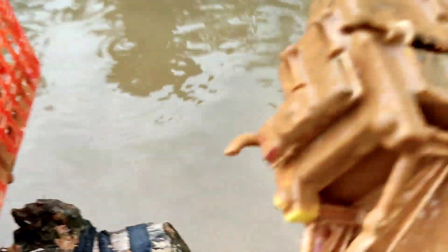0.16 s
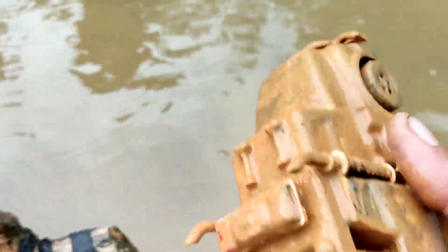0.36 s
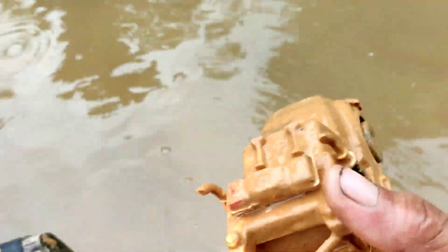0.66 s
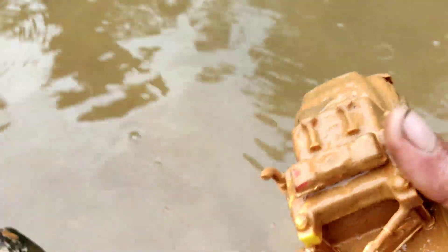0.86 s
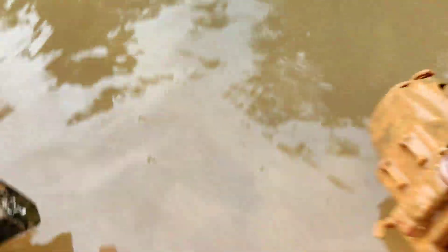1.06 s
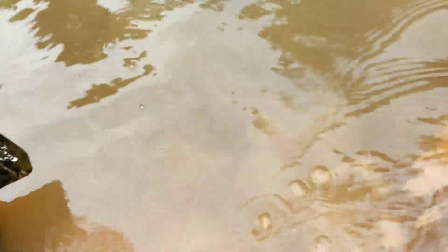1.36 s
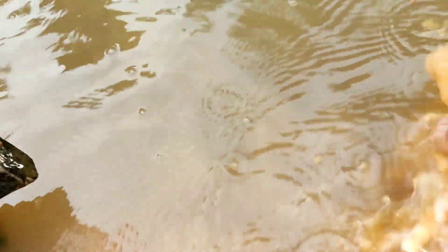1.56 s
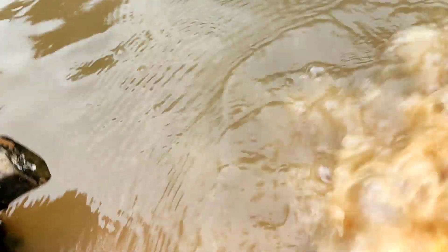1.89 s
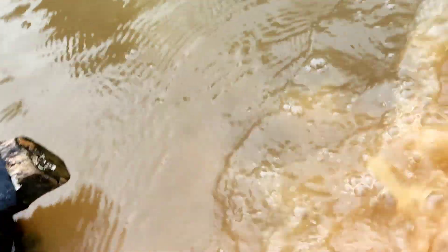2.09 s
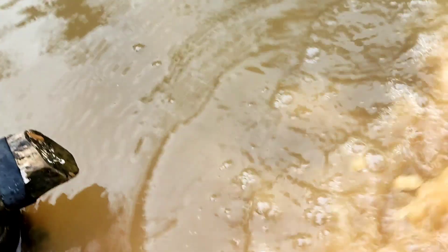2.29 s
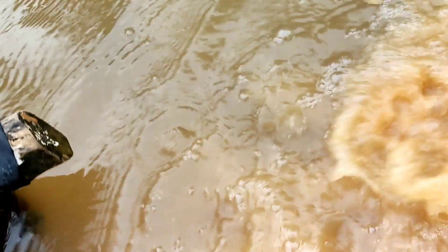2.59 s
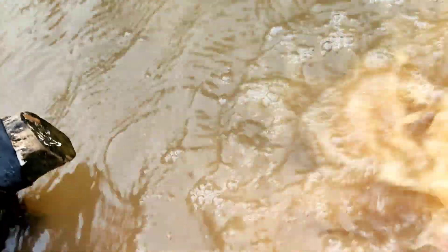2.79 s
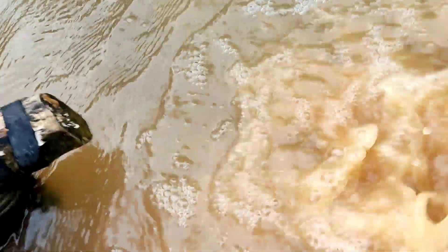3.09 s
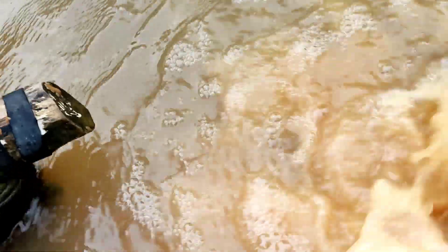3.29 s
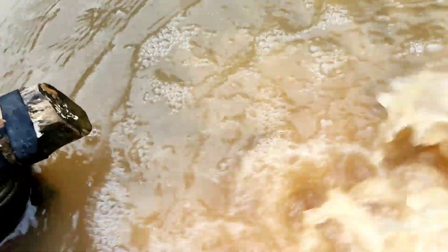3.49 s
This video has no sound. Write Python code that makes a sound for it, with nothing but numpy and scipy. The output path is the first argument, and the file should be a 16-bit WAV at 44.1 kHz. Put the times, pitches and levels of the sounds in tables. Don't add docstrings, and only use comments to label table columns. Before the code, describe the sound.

Water sloshing: a hollow toy drips, gets dunked three times, then is swished to and fro

```python
import sys
import numpy as np
from scipy import signal
from scipy.fft import rfft, irfft
from scipy.io import wavfile

SR = 44100
rng = np.random.default_rng(int(sys.argv[2]) if len(sys.argv) > 2 else 0)


def generate_wav(signal):
    frames = np.transpose(np.atleast_2d(signal))
    scaled = np.clip(frames, -1, 1) * 32767
    pcm = np.round(scaled).astype(np.int16)
    wavfile.write(sys.argv[1], SR, pcm)


def gain_from_db(level_db):
    decades = np.asarray(level_db, float) / 20
    return 10 ** decades


N = 160965
PORT_LAG = -5


def in_time(rows, outside_db=-90):
    s, *columns = np.transpose(rows)
    t = np.arange(N) / SR
    return np.array([np.interp(t, s, c, outside_db, outside_db) for c in columns])


def rms_one(x):
    return x / np.sqrt(np.mean(x ** 2) + 1e-20)


def drift(rate):
    knots = rng.standard_normal(int(N / SR * 60) + 3)
    smooth = signal.lfilter([1], [1, -np.exp(-rate / 10)], knots)
    return np.interp(np.arange(N) / SR * 60, np.arange(len(knots)), rms_one(smooth))


# (frequency [Hz], coherence [0-1])
COHERENCE = [(30, 0.5), (100, 0.93), (300, 0.76), (900, 0.84), (2000, 0.06), (5000, 0), (12000, 0.15)]


def field(spectrum):
    hz = np.maximum(np.fft.rfftfreq(N, 1 / SR), 1)

    def read(points):
        point_hz, value = np.transpose(points)
        return np.interp(np.log(hz), np.log(point_hz), value)

    common, left, right = rfft(rng.standard_normal((3, N)))
    alike = np.clip(read(COHERENCE), 0, 1)
    lag = np.array([np.exp(-2j * np.pi * hz * PORT_LAG / SR), np.ones(len(hz))])
    shared = np.sqrt(alike) * common * lag
    separate = np.sqrt(1 - alike) * np.array([left, right])
    inside = (hz > spectrum[0][0] / 2) & (hz < spectrum[-1][0] * 2)
    return rms_one(irfft((shared + separate) * gain_from_db(read(spectrum)) * inside, N))


def patchy(noise, edges_hz, depth_db, rate):
    out = np.zeros_like(noise)
    for k, band in enumerate(zip(edges_hz, edges_hz[1:])):
        sos = signal.butter(2, band, "band", fs=SR, output="sos")
        swell = gain_from_db(depth_db * np.minimum(drift(rate), 1))
        out += (-1) ** k * signal.sosfilt(sos, noise) * swell
    return out


def port(x, resonances):
    out = x.copy()
    for hz, width_hz, db in resonances:
        r = np.exp(-np.pi * width_hz / SR)
        zeros = [(1 - r * r) / 2, 0, (r * r - 1) / 2]
        poles = [1, -2 * r * np.cos(2 * np.pi * hz / SR), r * r]
        out += gain_from_db(db) * signal.lfilter(zeros, poles, x)
    return out


def plops(s, db, hz, cycles, rise, onset_s=0.00068):
    out = np.zeros(N + SR)
    for start, gain, f in zip((s * SR).astype(int), gain_from_db(db), hz):
        turns = np.arange(int(3 * cycles / f * SR)) * f / SR
        shape = np.exp(-2 * turns / cycles) * np.minimum(turns / f / onset_s, 1)
        out[start:start + len(turns)] += gain * shape * np.sin(2 * np.pi * turns * (1 + rise * turns))
    return np.array([np.roll(out[:N], PORT_LAG), out[:N]])


def clumps(marks, length_s):
    r = np.exp(-1 / (length_s * SR))
    return signal.filtfilt([np.sqrt(2 / (1 - r)) * (1 - r)], [1, -r], marks + 1e-18)


# (frequency [Hz], density [dB per Hz])
AIR_COLOUR = [(150, 6.5), (500, -2), (1000, -4), (2500, -1), (6000, -2), (8300, -5.5), (12500, 1.5),
              (14000, -5.5)]
# (frequency [Hz], density [dB per Hz])
WIND_COLOUR = [(15, -7), (25, 13.5), (40, -4), (65, 8.5), (100, -5.5), (200, -8.5), (300, -30)]
# (centre [Hz], width [Hz], level [dB])
INSECT_BAND = [(9150, 450, 6)]
# (time [s], level [dB])
RECORDER_GAIN = [(0, 6.5), (.6, 8), (1.32, 10), (1.4, 1.5), (1.6, 2), (3.65, 4)]
HISS_BANDS = [400, 1500, 2500, 3300, 4300, 5600, 7200, 9000, 11300, 13500, 17000]


def outdoors():
    gain_db = in_time(RECORDER_GAIN, -7)[0]
    air = port(field(AIR_COLOUR), INSECT_BAND)
    hiss = gain_from_db(-51.5 + gain_db) * patchy(air, [60, *HISS_BANDS], 1.5, 12.0)
    wind_db = -50 + .9 * gain_db + 1.5 * drift(9.0)
    return hiss + gain_from_db(wind_db) * field(WIND_COLOUR)


# (time [s], peak level [dB], pitch [Hz])
DRIP_EVENTS = [(0.083, -41, 1540), (0.12, -34, 1800), (0.135, -34, 1040), (0.15, -39.5, 910),
               (0.433, -39.5, 980), (0.502, -36.5, 2660), (0.535, -37, 1510), (0.627, -33.5, 1070),
               (0.661, -38, 1020), (0.684, -38, 1190), (0.728, -36.5, 1010), (0.959, -23.5, 618),
               (1.07, -35.5, 1125), (1.208, -35.5, 1430), (1.24, -36.5, 990)]


def drips():
    s, db, hz = np.transpose(DRIP_EVENTS)
    marks = np.zeros(N)
    marks[(s * SR).astype(int)] = gain_from_db(db - 0.5)
    tick_colour = [(300, -11), (900, -1.5), (3000, -1.5), (6000, -15.5)]  # (Hz, dB per Hz)
    ticks = clumps(marks, 0.003) * field(tick_colour)
    bubbles = plops(s, db - 10 * (hz < 700), hz, 14, 0.0073)

    draws = rng.random((70, 3))
    trickle_s = 0.33 + 0.72 * draws[:, 0]
    trickle_db = -53 + 14 * draws[:, 2] ** 2
    trickle_hz = 850 * gain_from_db(4.65 * draws[:, 1] ** 2)
    return bubbles + ticks + plops(trickle_s, trickle_db, trickle_hz, 11.0, 0.0216)


# (frequency [Hz], density [dB per Hz])
SPRAY_COLOUR = [(800, -3), (2000, 3.5), (3400, 0), (5000, -2), (7500, -2), (11000, -4), (14000, -3),
                (15500, -1)]
# (time [s], peak level [dB], left-right difference [dB])
SPIT_EVENTS = [(1.315, -4, 6), (1.3298, 4, -2), (1.349, 12, -11), (1.3557, 9.5, -3.5), (1.3607, 0, -11),
               (1.423, -3.5, 12), (1.451, 4, 5), (1.4754, -7, 5.5), (1.5937, -5, -11), (1.6171, 3.5, 1),
               (1.714, 3.5, 5), (1.739, 2.5, 3), (1.7695, 6.5, -11), (1.816, -5, 0), (1.8414, 4.5, -19),
               (1.848, 2, -14), (1.855, -3, 0), (2.0547, 14.5, -2), (2.116, -16, -12), (2.122, 2.5, -7),
               (2.1987, -1, -11), (2.2572, -6, 3), (2.3353, 10.5, -4), (2.3737, 5, 4), (2.5097, -4, -1),
               (2.6024, -7, 10), (2.6845, 11, 3), (2.692, 6, -7), (2.7144, 5, 11), (2.808, -15, 0),
               (2.87, 4.5, -4), (2.93, 6, 5), (3.0235, -7, 17), (3.1314, 10.5, 0.5), (3.2005, 0.5, 5),
               (3.258, -1, 12), (3.4014, 7.5, 2), (3.418, 1, 2)]


def spray(level):
    clumps_per_s, clump_s, clump_spread_db, bed = 200, .0013, 4.0, .5
    spit_s, spit_low_hz = .0007, 3440
    chosen = rng.random(N) < clumps_per_s / SR
    sizes = gain_from_db(clump_spread_db * np.minimum(rng.exponential(1, N), 4)) * chosen
    sides = gain_from_db(rng.normal(0, 0.68, N) * np.array([[1], [-1]]))
    grain = rms_one(bed + clumps(sizes * sides, clump_s) / 4) * gain_from_db(0.81 * drift(6.2))

    spits = np.zeros((2, N))
    for s, db, pan_db in SPIT_EVENTS:
        spits[:, int(s * SR)] = gain_from_db(-22.5 + db + np.array([pan_db, -pan_db]) / 2)

    hiss = patchy(field(SPRAY_COLOUR), HISS_BANDS, 3.84, 46.0)
    thin = signal.sosfilt(signal.butter(2, spit_low_hz, "high", fs=SR, output="sos"), hiss)
    return hiss * gain_from_db(-4) * level * grain + thin * clumps(spits, spit_s)


# (time [s], length [s], first pitch [Hz], last pitch [Hz], level [dB])
GLUG_EVENTS = [(1.661, 0.06, 350, 702, -36), (1.69, 0.054, 750, 1050, -28.5),
               (1.5, 0.0407, 1400, 1500, -35), (3.374, 0.031, 230, 272, -21),
               (2.295, 0.018, 220, 246, -27.5), (3.9, 0.066, 620, 670, -17), (3.7, 0.038, 230, 426, -14.5),
               (3.14, 0.073, 260, 283, -31), (2.178, 0.029, 270, 330, -23.5), (2.9, 0.031, 465, 320, -20.5),
               (1.8, 0.045, 240, 306, -24.5), (1.42, 0.036, 600, 430, -40.5)]


def glugs():
    out = np.zeros(N)
    waver = rms_one(clumps(rng.standard_normal(N), 0.001527))
    lumps = rms_one(clumps(rng.standard_normal(N), 0.0012))
    t = np.arange(N) / SR
    for s, length, first_hz, last_hz, db in GLUG_EVENTS:
        part = np.clip((t - s) / length, 0, 1)
        hz = first_hz * (last_hz / first_hz) ** part * (1 + .17 * waver)
        swell = gain_from_db(db + 3.4 * lumps) * np.sin(np.pi * part) ** .5
        out += swell * np.sin(2 * np.pi * np.cumsum(hz) / SR)
    return out


# (frequency [Hz], density [dB per Hz])
SLOSH_COLOUR = [(60, -61), (100, -20), (260, -8.5), (700, -14), (1200, -13.5), (2600, -12), (3400, -33),
                (5000, -15.5)]
SLOSH_BANDS = [40, 200, 400, 700, 1100, 1800, 2800, 6000]
# (time [s], peak level [dB], pitch [Hz])
POCKET_EVENTS = [(1.355, -13, 800), (1.472, -17.5, 448), (1.515, -24.5, 330), (1.616, -22, 178),
                 (1.708, -15.5, 557), (1.811, -16.5, 864), (1.835, -19.5, 930), (1.873, -13, 1620),
                 (1.93, -20, 780), (1.966, -9.5, 950), (1.98, -6.5, 1440), (2.014, -16, 400),
                 (2.077, -15, 920), (2.146, -25, 930), (2.179, -16, 990), (2.186, -17, 290),
                 (2.219, -16, 750), (2.254, -11, 1080), (2.392, -19, 1820), (2.483, -15.5, 920),
                 (2.543, -23.5, 900), (2.617, -19, 800), (2.637, -25, 950), (2.675, -17.5, 560),
                 (2.778, -12, 1520), (2.82, -12, 545), (2.852, -14, 996), (2.892, -13.5, 550),
                 (2.974, -28, 560), (3.021, -15, 1010), (3.055, -16, 1000), (3.095, -10, 973),
                 (3.242, -14.5, 990), (3.252, -11, 960), (3.291, -7, 835), (3.315, -10.5, 840),
                 (3.417, -20, 940), (3.432, -7.5, 664), (3.469, -8.5, 630), (3.49, -11.5, 743),
                 (3.525, -14, 547), (3.616, -24.5, 240)]


def gurgle(level):
    bubbles_per_s = 400
    draws = rng.random((int(bubbles_per_s * N / SR), 4))
    s, hz = draws[:, 0] * N / SR, 380 * gain_from_db(17.85 * draws[:, 1])
    bubble_db = -3.6 * np.log(draws[:, 2] + 0.075) - 6.9 * np.abs(np.log2(hz / 950))
    crowd = plops(s, bubble_db, hz, 7.0, .016)

    some = draws[::4]
    pop_db = -4.0 * np.log(some[:, 2] + .03)
    pops = plops(some[:, 3] * N / SR, pop_db, 300 + 1.3 * hz[::4], 1, 0, onset_s=.0001)
    pops = signal.lfilter([1, -1], [1, -.97], pops)

    slosh = patchy(field(SLOSH_COLOUR), SLOSH_BANDS, 4.53, 45.0)
    pockets = plops(*np.transpose(POCKET_EVENTS), 4.8, 0.011, onset_s=0.0008)
    churn = gain_from_db(-4.5) * slosh + gain_from_db(-3.5) * rms_one(crowd) + gain_from_db(-9.5) * rms_one(pops)
    return level * churn + pockets + glugs()


# (time [s], spray level [dB], gurgle level [dB])
DIP_STROKES = [
    [(1.3, -71, -83), (1.362, -17.5, -34), (1.38, -44, -47), (1.41, -25, -59)],
    [(1.41, -34, -44), (1.418, -58, -37), (1.502, -15, -30), (1.57, -57, -56)],
    [(1.57, -47, -43), (1.624, -33.5, -37), (1.63, -42.5, -51), (1.78, -36.5, -34.5)],
]
# (time [s], spray level [dB], gurgle level [dB])
SWISH_STROKES = [
    [(1.78, -31.5, -38.5), (1.852, -23.5, -33.5), (1.866, -25.5, -35.5), (1.95, -20, -27.5),
     (2.064, -20, -30), (2.145, -42, -37.5)],
    [(2.145, -43, -35), (2.195, -24.5, -21.5), (2.293, -19, -25), (2.363, -33, -36.5), (2.375, -21, -42),
     (2.39, -54, -39.5)],
    [(2.39, -32.5, -33), (2.478, -25.5, -30), (2.51, -16.5, -26), (2.518, -34, -38), (2.576, -32.5, -43),
     (2.595, -42, -40)],
    [(2.595, -49, -41), (2.603, -35.5, -34.5), (2.637, -26.5, -25.5), (2.673, -28.5, -28.5),
     (2.679, -23, -22.5), (2.795, -30, -42)],
    [(2.795, -30, -40), (2.829, -18, -25.5), (2.879, -29.5, -32), (2.891, -26, -20), (2.921, -29.5, -29),
     (3.0, -30, -39)],
    [(3.0, -30, -36), (3.022, -25.5, -24.5), (3.11, -25, -27), (3.132, -24, -23), (3.138, -26.5, -31.5),
     (3.22, -23.5, -40)],
    [(3.22, -21, -34), (3.25, -23, -21), (3.282, -23.5, -29), (3.29, -23, -21.5), (3.366, -19.5, -26),
     (3.39, -29, -33)],
    [(3.39, -30, -27), (3.406, -30, -31), (3.442, -18, -21), (3.524, -24, -20.5), (3.556, -17.5, -19.5),
     (3.65, -24.5, -31.5)],
]


def scene():
    strokes = [in_time(rows) for rows in [*DIP_STROKES, *SWISH_STROKES]]
    spray_level, gurgle_level = gain_from_db(np.max(strokes, axis=0))
    return outdoors() + drips() + spray(spray_level) + gurgle(gurgle_level)


# (centre [Hz], width [Hz], level [dB])
LEFT_PORT = [(904, 230, -7.5), (10690, 1350, 4.5), (12200, 810, 17.5)]
# (centre [Hz], width [Hz], level [dB])
RIGHT_PORT = [(1013, 44, 0), (9590, 475, 14), (10590, 470, 17), (13500, 400, -8)]


def microphones(dry):
    dull = signal.butter(2, 12000, fs=SR, output="sos")
    right = signal.sosfilt(dull, port(dry[1], RIGHT_PORT))
    return np.array([port(dry[0], LEFT_PORT), right])


def roll_off(x):
    return signal.sosfilt(signal.butter(12, 16300, fs=SR, output="sos"), x)


def record(dry):
    x = np.clip(microphones(dry), -1, 1)
    x = signal.sosfilt(signal.cheby2(14, 60, 16300, fs=SR, output="sos"), x)
    return roll_off(x)


dry = scene()
out = record(dry)
generate_wav(out)
```